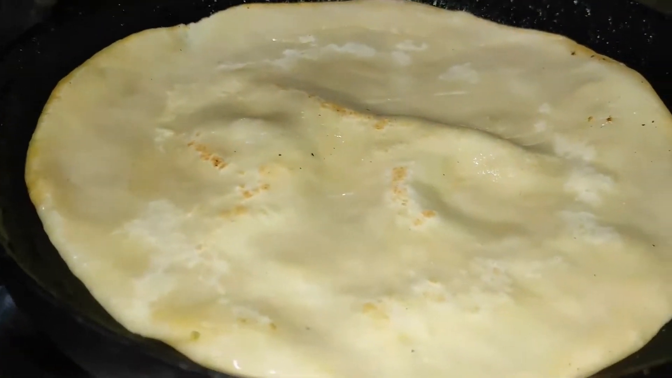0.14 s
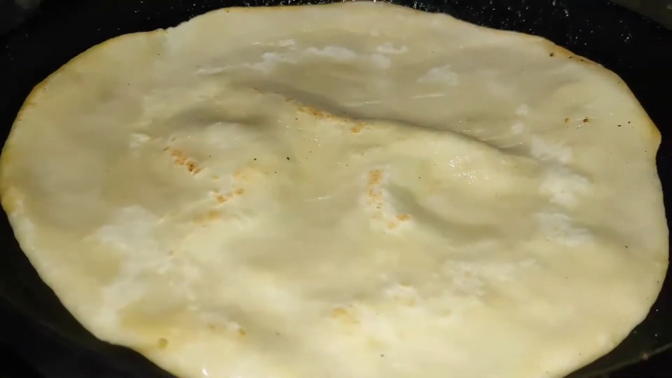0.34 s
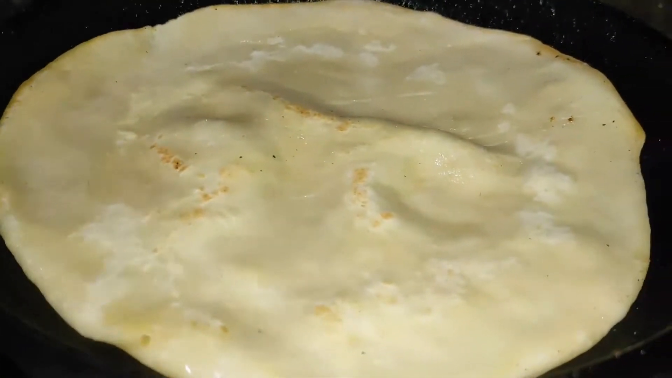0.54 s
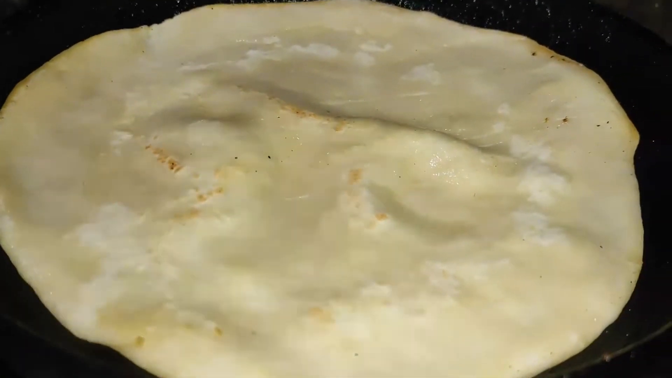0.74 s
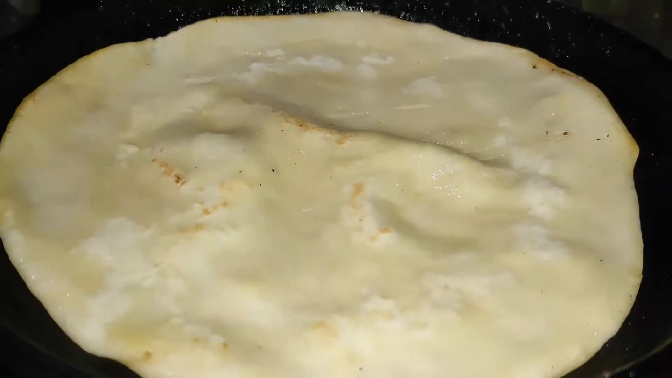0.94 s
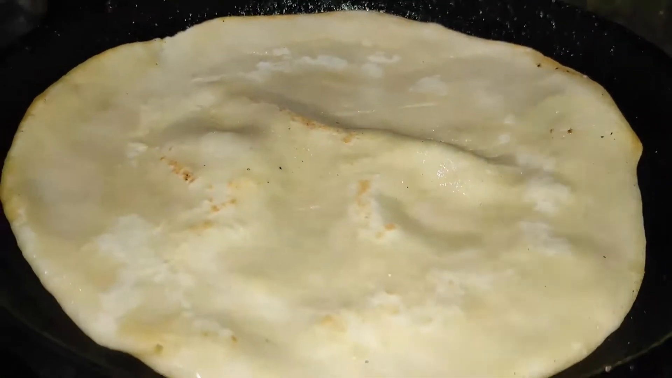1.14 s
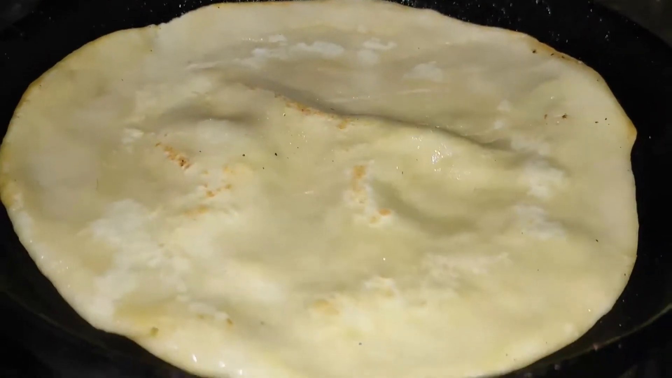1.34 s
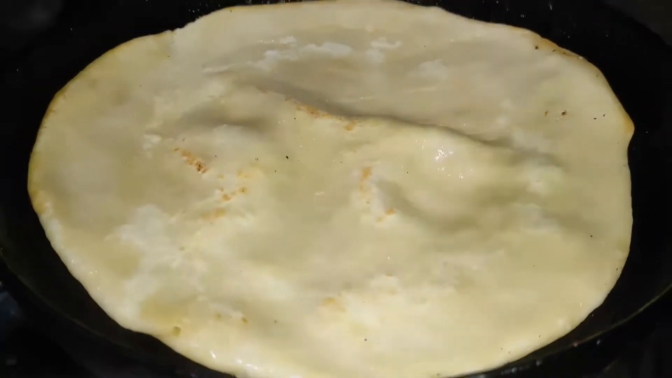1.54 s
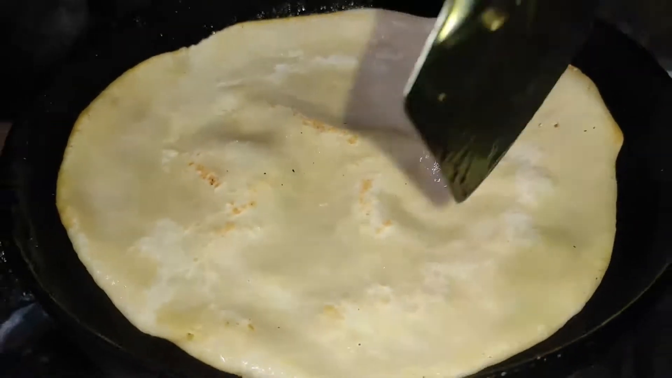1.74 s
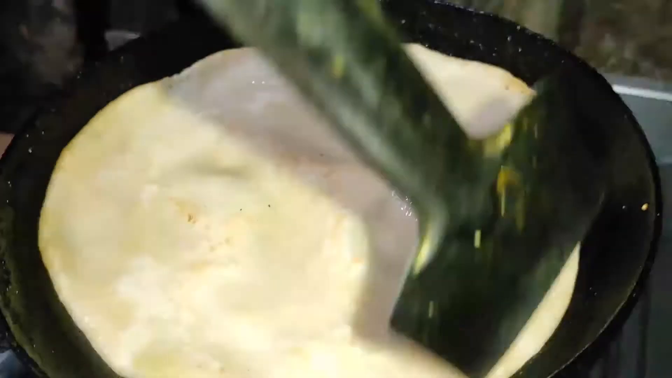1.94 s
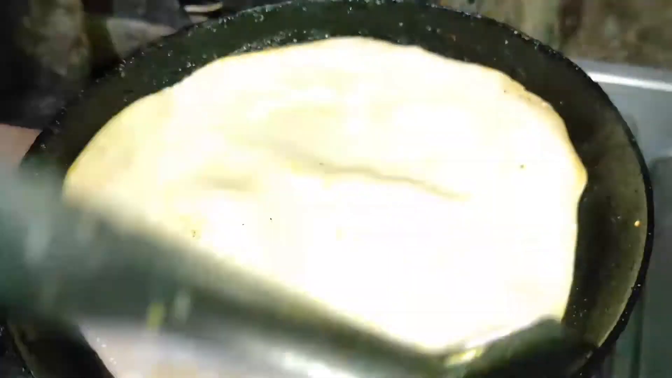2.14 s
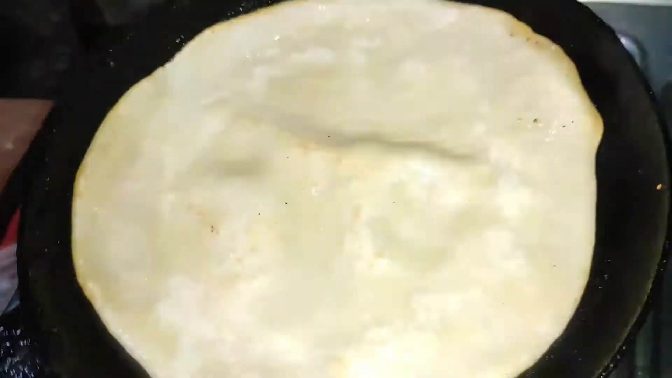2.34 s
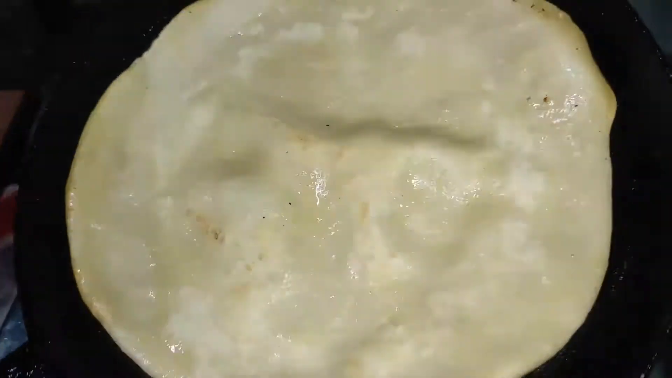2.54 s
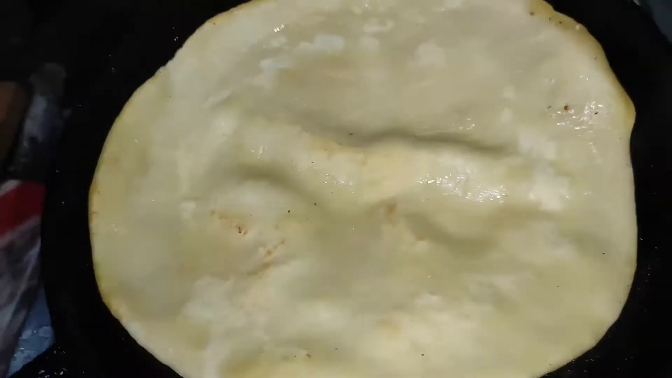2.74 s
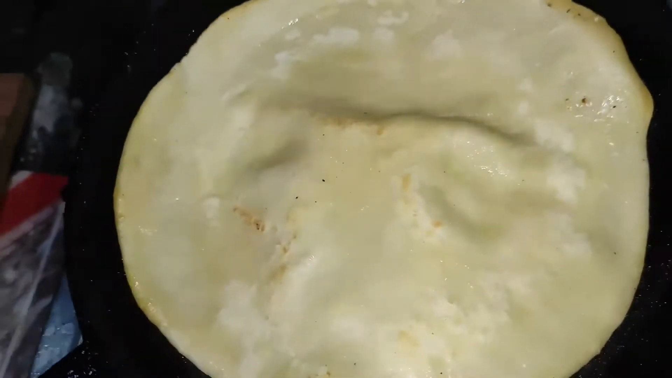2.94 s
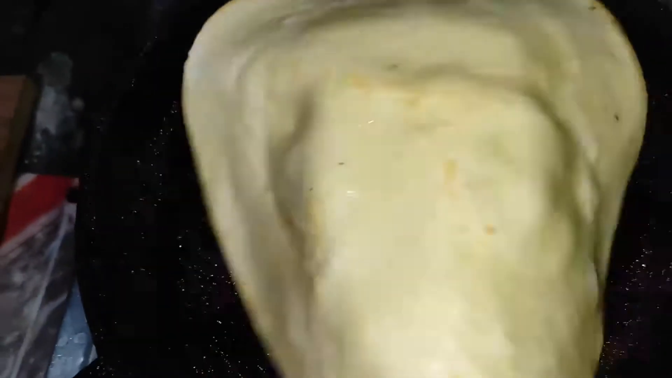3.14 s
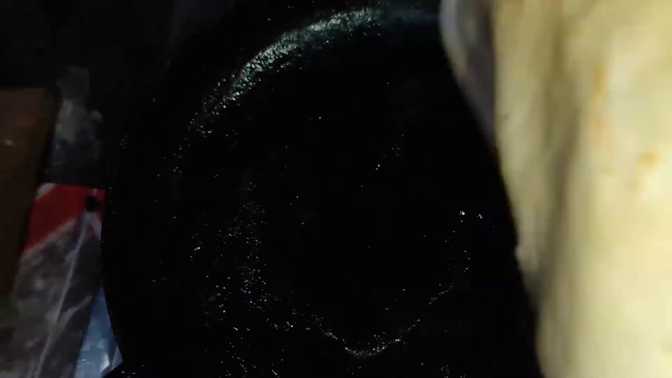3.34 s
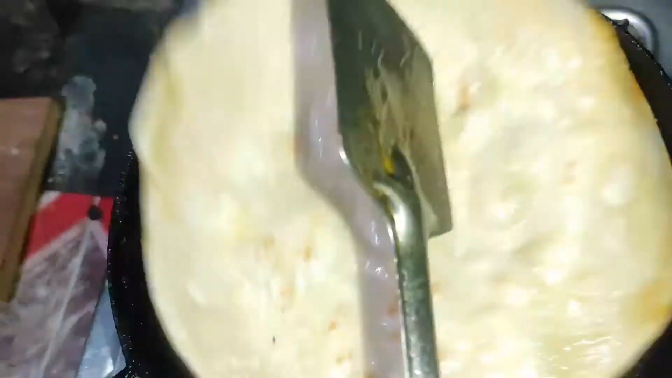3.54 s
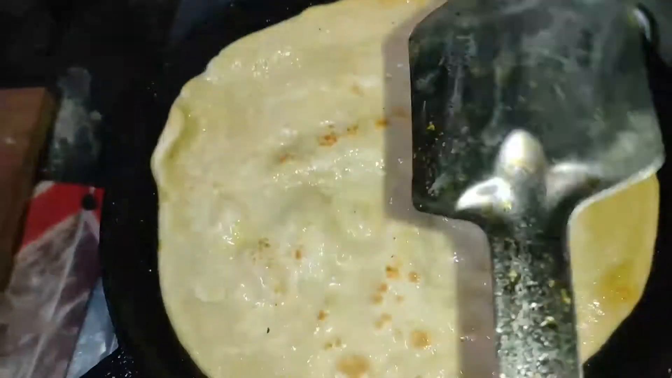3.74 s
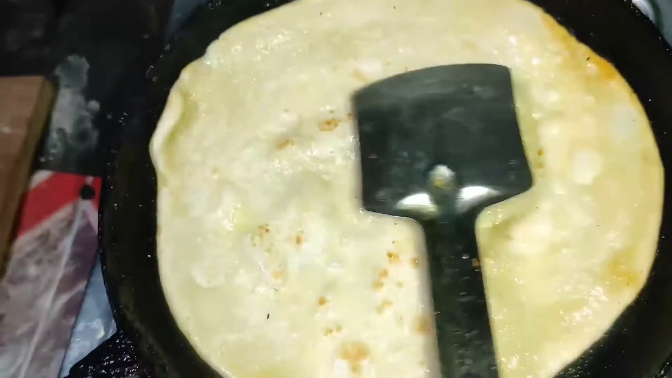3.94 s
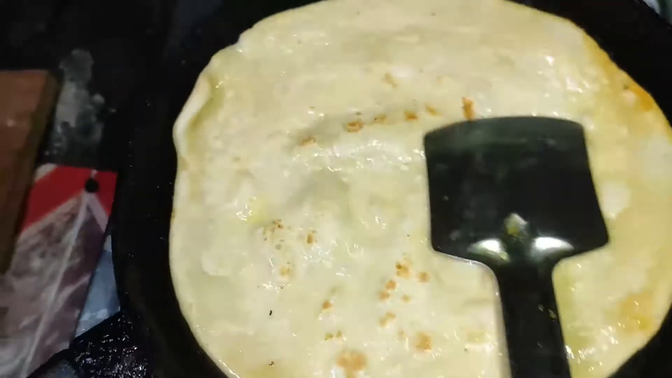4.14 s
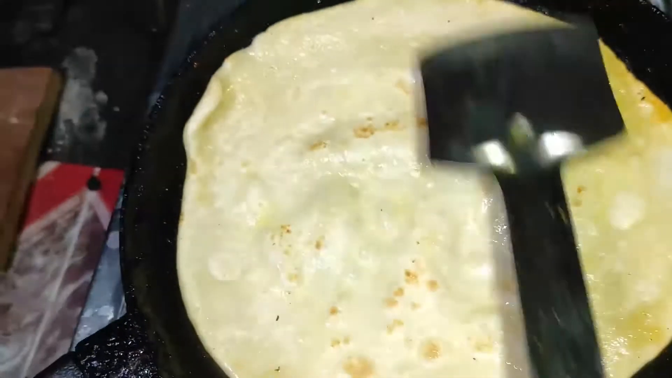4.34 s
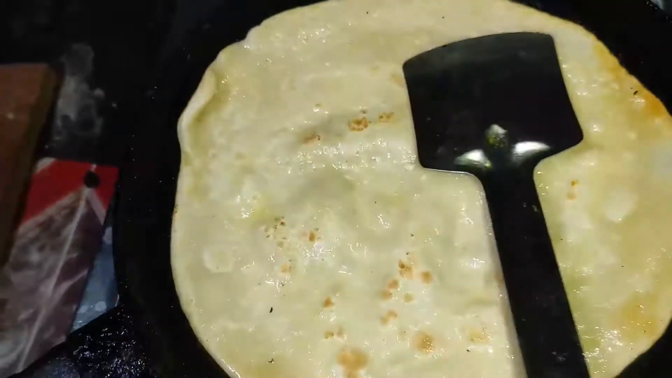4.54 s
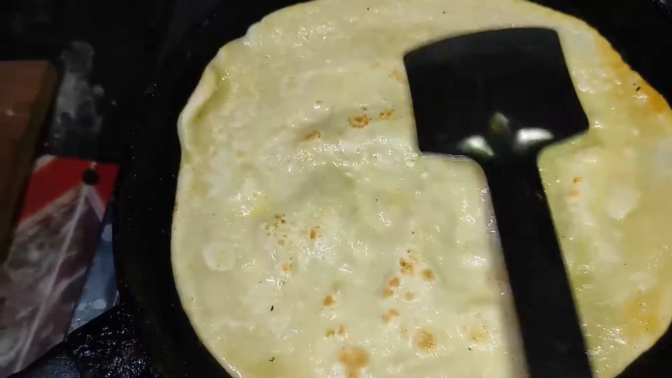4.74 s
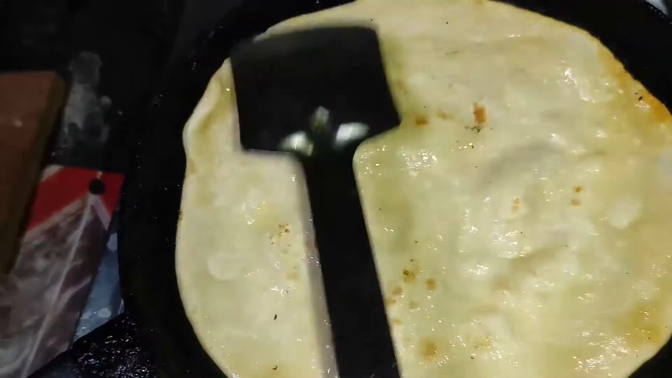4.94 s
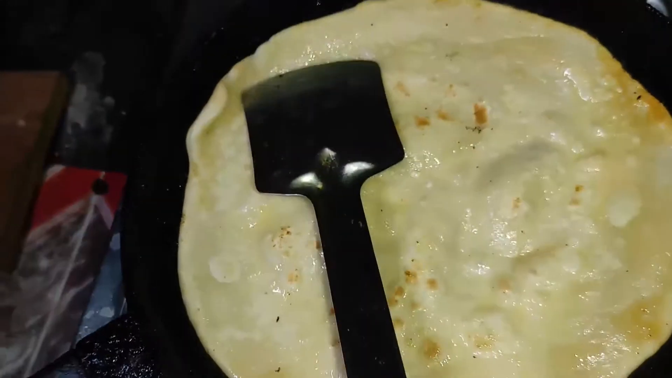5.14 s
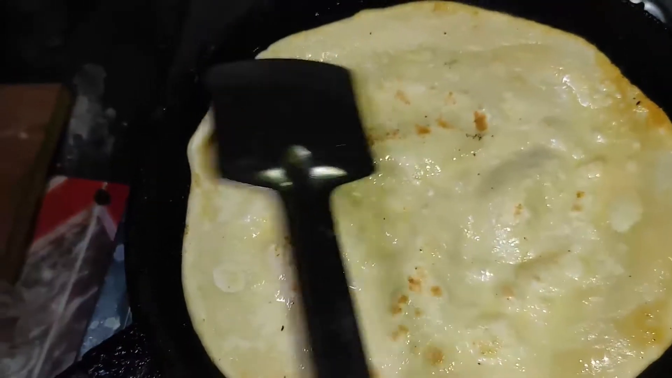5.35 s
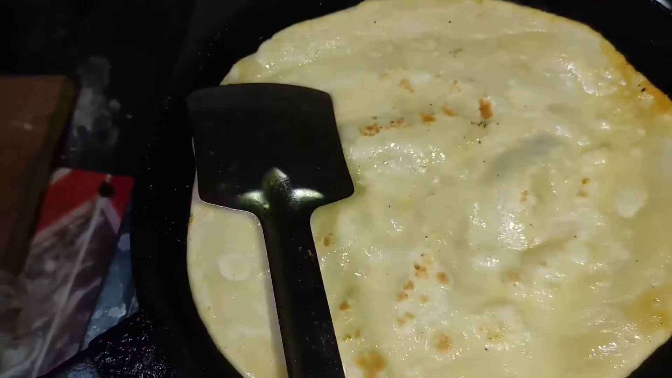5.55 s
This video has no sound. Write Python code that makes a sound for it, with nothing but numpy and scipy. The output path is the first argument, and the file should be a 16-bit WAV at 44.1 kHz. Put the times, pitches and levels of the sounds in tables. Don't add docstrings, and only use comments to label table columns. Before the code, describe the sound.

A metal spatula knocks and scrapes on a heavy pan as frying bread hisses, spits and crackles softly in a close, quiet kitchen.

```python
import sys
import numpy as np
from scipy import signal
from scipy.fft import rfft, irfft, next_fast_len
from scipy.io import wavfile
from scipy.ndimage import uniform_filter1d

SR = 44100
rng = np.random.default_rng(int(sys.argv[2]) if len(sys.argv) > 2 else 0)


def store_pcm(level_fs):
    pcm = np.round(np.clip(level_fs, -1, 1) * 32767).astype(np.int16)
    wavfile.write(sys.argv[1], SR, np.atleast_2d(pcm).T)


def elevation(decibels):
    levels = np.asarray(decibels, float)
    return 10 ** (levels / 20)


N = 247401

# peak_s, crack_db, pan_ring_db, ring_t60_s, rise_s
BLOWS = [(2.371, -35, -33, 0.46, 0.00098), (2.414, -32.5, -48, 0.37, 0.0013), (2.508, -41, -41, 1, 0.011),
         (2.7, -40, -43.5, 0.11, 0.0033), (2.988, -6.5, -26.5, 0.39, 0.0016),
         (3.325, -52, -46.5, 0.3, 0.0023), (3.943, -8, -20, 0.34, 0.0044),
         (3.971, -11.5, -24, 0.18, 0.0028), (3.983, -17.5, -25, 0.44, 0.00192),
         (4.344, -32, -54, 0.15, 0.0024), (4.416, -37.5, -48.5, 0.34, 0.0019),
         (4.806, -31.5, -43.5, 0.53, 0.00077), (5.345, -51, -49.5, 0.58, 0.0036)]
# pitch_hz, width_hz, level_db
BLADE_EDGE = [(1000, 95, 3.5), (1283, 96, 7.5), (1760, 83, -5), (1870, 110, -20), (2200, 410, -1),
              (2710, 200, 1), (3120, 65, 1), (3450, 190, -6), (3730, 290, -3)]
# pitch_hz, level_db, t60_s
PAN_MODES = [(102, -43, 0.32), (199.7, -11.5, 0.86), (241, -4, 0.28), (350, 3, 0.34), (427.5, 1, 0.34),
             (450, 5.5, 0.094), (563, -14.5, 0.16), (684, -2, 0.17), (870, -10, 0.19), (890, -26, 0.49),
             (1068, -1, 0.16), (1180, -0.5, 0.1), (1330, -19, 0.49), (1755, 0.5, 0.16), (1890, -47, 0.35),
             (2260, -12, 0.3), (2760, -38, .3)]
# pitch_hz, level_db (per Hz)
STOVE_THUD = [(12, -53), (20, -37), (70, -20), (100, -14), (188, -3), (260, -2.5), (351, -2.5), (508, -1),
              (702, 2), (884, -5), (1090, -3), (1810, -21.5), (5000, -48), (6500, -75), (11000, -120)]
HARD_HZ, DB_PER_OCTAVE = 2280, 25

# peak_s, pressure_db, rise_s, fall_s, blade_hz
RUBS = [
    (2.385, -39, 0.014, 0.013, 800),
    (2.424, -42, 0.016, 0.012, 726),
    (2.502, -37, 0.028, 0.022, 760),
    (2.71, -44.5, 0.22, 0.077, 697),
    (3.334, -52, 0.043, 0.011, 825),
    (1.45, -59, 0.05, 0.071, 720),
    (4.53, -45, 0.1, 0.042, 465),
    (5.36, -62, 0.041, 0.13, 820),
]
# peak_s, pressure_db, rise_s, fall_s, blade_hz
DRAGS = [
    (2.97, -44.5, 0.088, 0.071, 1090),
    (3.012, -35, 0.019, 0.063, 1110),
    (3.1, -42, 0.093, 0.085, 1280),
    (3.22, -57, 0.093, 0.096, 930),
    (4.36, -57, .01, 0.028, 900),
    (4.49, -48.5, 0.11, 0.094, 950),
]
RUB_UPPER_DB, DRAG_UPPER_DB, UPPER_HZ = -24, -5, 2345
SAG_PER_S, SAG_FLOOR = 1.42, 0.73
UPPER_SAG = 0.3
# peak_s, level_db, rise_s, fall_s, pitch_hz
CAUGHT_NOTES = [(2.385, -41, 0.0093, 0.0073, 700), (2.389, -45, 0.0084, 0.03, 268),
                (2.44, -38.5, 0.043, 0.006, 474), (2.509, -44.5, 0.0097, 0.025, 930),
                (2.51, -40, .015, 0.022, 240), (2.51, -37.5, .015, 0.011, 459),
                (2.565, -44, 0.018, 0.016, 430), (2.595, -49.5, 0.021, 0.013, 238),
                (2.645, -54, 0.017, 0.01, 895), (2.72, -41.5, 0.029, 0.01, 727),
                (2.752, -48, 0.012, 0.014, 720), (2.845, -50, 0.022, 0.0092, 720),
                (2.941, -45.5, 0.032, 0.014, 437), (3.02, -44, 0.016, 0.034, 1308),
                (3.075, -43.5, 0.025, 0.033, 2200), (3.1, -36, 0.048, 0.04, 1333),
                (3.115, -42, 0.038, 0.027, 3200), (3.13, -42, 0.028, 0.025, 910),
                (3.145, -41.5, 0.027, 0.018, 2365), (3.18, -45.5, 0.041, 0.043, 2100),
                (3.204, -39.5, 0.029, 0.022, 967), (3.209, -48, 0.013, .02, 3120),
                (3.24, -46, 0.018, 0.014, 2110), (3.264, -41.5, .015, 0.02, 995),
                (3.33, -46.5, 0.014, 0.007, 784), (3.99, -29, 0.017, 0.013, 350),
                (4.83, -53.5, .02, 0.059, 231.3), (4.0, -43.5, 0.033, 0.083, 102),
                (4.25, -56, 0.084, 0.046, 328.7)]
NOTE_WIDTH_HZ, NOTE_SAG_PER_S = 57, 0.54

# pitch_hz, level_db (per Hz)
FIZZ_COLOUR = [(2060, -34), (3500, -19), (3680, -19.5), (3870, -20.5), (4100, -19.5), (4400, -19.5),
               (6120, -17), (6610, -10), (7800, -2), (8530, -4), (9620, -17), (11700, -22), (14000, -23),
               (16000, -25.5)]
# pitch_hz, level_db (per Hz)
HISS_COLOUR = [(530, -10.5), (900, -11), (1530, -7), (2220, -7), (2390, -2), (3010, -2.5), (3470, -9),
               (4710, -9), (6500, -1.5), (8450, -6.5), (14300, -120)]
# pitch_hz, level_db
WET_TILT = [(1500, -4), (3000, 1.5), (3600, 3.5), (5000, 3.5), (6500, 3.5), (9000, -16.5), (13000, 0)]
# (relative to fizz, added to HISS_DB)
HEAT = [(0, -52, 8), (.2, -48, -3), (.44, -48.5, 5), (.84, -47, 1), (.95, -49, -2.5), (1.55, -49, 0.5),
        (2.0, -47.5, 3.5), (2.36, -52, 0), (2.6, -49, -0.5), (2.95, -46.5, 6.5), (3.4, -50, -8),
        (3.7, -55, 1), (4.0, -52, 10.5), (4.3, -53.5, 0), (4.8, -52, 0), (5.2, -52.5, -0.5),
        (5.61, -50.5, 6)]
# peak_s, fizz_db, rise_s, fall_s, hiss_db (relative to fizz)
SURGES = [(1.7, -47.5, 0.37, 0.039, -2), (2.385, -44, 0.02, 0.03, -10), (2.499, -37, 0.034, 0.015, -7),
          (2.699, -43, 0.21, 0.018, -2), (2.981, -44, 0.057, 0.042, 8), (3.06, -32.5, 0.4, 0.47, -6.5),
          (3.201, -34.5, 0.25, 0.14, -9), (3.77, -45.5, .07, 0.13, -12), (3.939, -41, 0.0079, 0.0052, 23),
          (3.957, -34, 0.0099, 0.065, 2.5), (4.392, -47.5, 0.03, 0.05, -16),
          (4.425, -43, 0.036, 0.078, -11), (4.5, -52, 0.26, 0.1, 6), (4.821, -57, 0.027, 0.34, 1.5),
          (5.05, -61, 0.16, 0.043, 6)]
HISS_DB, FRESH_DB, DRYING_S = -10, 13, 0.62
HISS_FALL = 0.63

# start_s, peak_db, pan_db (left minus right)
SPITS = [(0.059, -36, 7), (0.183, -39, 11), (1.644, -37, -8), (1.9, -39, 8), (2.372, -26.5, -3),
         (2.487, -34, -13), (2.62, -35, -1), (3.067, -21, 1), (2.635, -30, -7), (2.814, -46, 10),
         (2.892, -34, -1), (2.926, -29, 5), (2.959, -41, -3), (2.991, -19, 5), (3.599, -35, 7),
         (3.668, -42, 7), (3.8336, -28, -6), (4.1653, -39, -7), (2.378, -34, -2), (4.801, -38, 0)]
# start_s, peak_db, pan_db
SPLASHES = [
    (0.0233, -40.5, 6),
    (2.413, -31, -4),
    (2.505, -26, -5),
    (3.543, -33, -2),
    (3.743, -27.5, 10),
    (3.8295, -30, 6),
    (3.939, -14.5, 1),
    (3.942, -10.5, 1.5),
    (4.342, -34, -2.1),
]
SPIT_HZ, SPIT_S = 5750, 0.0016
SPLASH_HZ, SPLASH_S = 2850, 0.00223
# start_s, peak_db, lowest_hz, pan_db
CRACKLES = [(0.0235, -32, 2980, 5), (0.222, -38, 3500, 11), (2.369, -33, 5500, 0),
            (2.4114, -21.5, 2500, -1), (2.532, -40, 6000, 2), (2.7948, -45, 6000, -2),
            (2.859, -30, 6000, 1), (2.8902, -26, 5500, 0), (2.981, -27, 5500, 0), (3.0715, -29, 6500, 1),
            (3.3058, -25.5, 5590, -8), (3.3925, -29, 5500, -1), (3.4478, -35, 5500, 0),
            (3.4673, -30, 5500, 2), (3.5147, -28, 5500, -3), (3.5215, -26, 5500, 0),
            (3.5378, -19.5, 2540, 0), (3.5535, -31, 5500, 0), (3.576, -28, 5000, -2),
            (3.5925, -26.5, 4500, -4), (3.6065, -29, 4200, -3), (3.6638, -23, 3200, 3),
            (3.7385, -25, 2500, 5), (3.752, -35, 4510, 4), (3.7701, -36, 5500, 8), (3.828, -27, 2500, 3),
            (4.1657, -27, 4460, -3), (4.317, -33, 5000, 4), (4.4195, -37, 5000, 1), (4.4575, -37, 5500, 1),
            (4.9246, -42, 6000, -1), (5.4619, -43, 6000, -1)]
CRACKLE_S = 0.0015
# pitch_hz, level_db
CRACKLE_TOP = [(6500, -2), (8200, 7.5), (9800, -12), (12500, -11.5), (15500, -18.5)]
# start_s, peak_db, centre_hz
TICKS = [(0.025, -34.5, 2730), (0.0867, -37, 2330), (0.192, -34.5, 2620), (0.409, -46, 1500),
         (0.524, -43, 980), (.663, -41, 1900), (0.592, -38, 2850), (0.974, -38.5, 1830), (1.403, -46, 1510),
         (1.515, -59, 2020), (1.598, -42, 2000), (1.838, -44, 1200), (2.413, -27, 3450),
         (4.8015, -38, 2800), (4.8045, -21.5, 2540), (4.8047, -27.5, 3460), (4.8045, -34, 1650),
         (4.345, -37, 2900), (4.3455, -41, 4000), (4.352, -42, 3300), (3.607, -45, 2300),
         (4.8082, -36, 880), (5.054, -41, 2270), (5.345, -39, 2200)]
TICK_WIDTH, TICK_S = 0.65, 0.0013

# start_s, peak_db, t60_s, upper_modes_db, pan_db
TINKLES = [
    (0.588, -49, 0.13, -13, 16),
    (0.6986, -40.5, 0.15, -17, 19.5),
    (0.8403, -35, 0.22, -16, 6.5),
    (2.4694, -48, 0.21, -19, -1),
    (3.639, -36.5, 0.15, -23, 18),
    (4.344, -42.5, 0.14, -28, 15.5),
    (4.8015, -45, 0.06, -10, 5),
    (4.8165, -48, 0.23, -22, 12),
    (4.8266, -43.5, 0.18, -22, 10),
    (0.8268, -44, 0.15, -18, 5),
]
# pitch_hz, level_db, t60_share
TINKLE_MODES = [(8410, 3.5, 0.65), (12200, -13, 0.25), (7560, -6.5, 0.48), (14500, -19, .5),
                (5880, -34, 0.4)]

# time_s, level_db
RUMBLE = [(0, -58.5), (.5, -57.5), (1.1, -59), (1.36, -60.5), (1.45, -56), (1.7, -58), (2.0, -60),
          (2.6, -59.5), (3.3, -56.5), (3.6, -62.5), (3.9, -61.5), (4.2, -58.5), (4.6, -58.5), (5.2, -61),
          (5.61, -60.5)]
# pitch_hz, level_db (per Hz)
RUMBLE_COLOUR = [(12, -29.5), (20, 0), (38, -5.5), (54, 6), (74, -11), (103, 4), (134, -8), (160, -1.5),
                 (240, 1), (312, -6), (398, -14.5), (431, -8), (487, -15), (660, -7), (1160, -13),
                 (2500, -13.5), (3250, -15.5), (5500, -120)]
# pitch_hz, likeness (0 to 1)
LIKENESS = [(60, 1), (150, 0.78), (380, 1), (950, 0.75), (2380, 0.15), (5980, 0.041), (15000, 0.033)]
# pitch_hz, t60_s
KITCHEN = [(150, 0.22), (600, 0.4), (2000, 0.46), (6000, 0.05), (14000, 0.27)]

# pitch_hz, level_db
PORT_DB = [(60, 2), (110, 3.5), (200, 5), (380, 3.5), (700, 2), (1290, -1), (2380, 4.5), (4400, 1),
           (8120, 1), (15000, 3.5)]
# pitch_hz, phase_rad
PORT_LEAD = [(60, 0.85), (500, -0.68), (1200, -0.94), (2500, -1.3), (5000, -1.94), (9000, -1),
             (15000, -7.5)]
# pitch_hz, level_db
TOP_EDGE = [(15700, 0), (16000, -22), (16600, -30), (16750, -100)]
# pitch_hz, share (of surrounding power below which a spot is shut)
GATE_SHARE = [(1000, 0.05), (1500, .3), (3000, .35), (3600, .78), (6300, .78), (7500, .62), (9000, .66),
              (10000, .84), (16000, .86)]
GATE_DB = -36
SUDDEN = 1.5


def evened(x):
    return x / np.sqrt(np.mean(x ** 2) + 1e-20)


def read(points, hz):
    f, value = np.transpose(points)
    return np.interp(np.log(hz + 1), np.log(f + 1), value)


def follow(rows, column):
    rows = np.array(rows)
    return np.interp(np.arange(N) / SR, rows[:, 0], rows[:, column])


def add(mix, s, sound):
    part = mix[..., max(round(s * SR), 0):][..., :sound.shape[-1]]
    part += sound[..., :part.shape[-1]]


def placed(peak_db, pan_db):
    return elevation(peak_db + pan_db * np.array([[.5], [-.5]]))


def burst(rise, fall, length):
    t = np.arange(round(length * SR)) / SR - rise
    return np.where(t < 0, np.exp(3 * np.minimum(t, 0) / rise), np.exp(-np.maximum(t, 0) / fall))


def colour(x, points):
    size = next_fast_len(x.shape[-1])
    gain = elevation(read(points, np.fft.rfftfreq(size, 1 / SR)))
    return evened(irfft(rfft(x, size) * gain, size)[..., :x.shape[-1]])


def causal(points):
    level_db = read(points, abs(np.fft.fftfreq(8192, 1 / SR)))
    log_gain = np.log(elevation(np.maximum(level_db, -100)))
    taps = np.fft.ifft(np.exp(np.conj(signal.hilbert(log_gain)))).real[:4096]
    return taps / np.linalg.norm(taps)


def resonate(x, hz, width):
    turn = np.exp(2j * np.pi * np.cumsum(hz * np.ones(len(x))) / SR)
    r = np.exp(-np.pi * abs(width) / SR)
    return 2 * (turn * signal.lfilter([1 - r], [1, -r], x / turn)).real


def dull(x, hz):
    return signal.sosfilt(signal.butter(2, np.clip(hz, 100, 15000), fs=SR, output="sos"), x)


def bed(points, patch_db, flicker_db):
    frames, hz = N // 128 + 5, np.fft.rfftfreq(512, 1 / SR)
    a, b, c, d, patches = rng.standard_normal((frames, 257, 5)).T
    patches = evened(uniform_filter1d(uniform_filter1d(patches, 6, 0), 16, 1))
    flicker = evened(uniform_filter1d(rng.standard_normal(frames), 4))
    same = np.clip(read(LIKENESS, hz), -1, 1)[:, None]
    left = a + 1j * b
    right = same * left + np.sqrt(1 - same ** 2) * (c + 1j * d)
    z = np.array([left, right]) * elevation(patch_db * patches + flicker_db * flicker)
    return colour(signal.istft(z, nperseg=512, noverlap=384)[1][:, :N], points)


def pan_body(damping, thud_db):
    t = np.arange(SR // 3) / SR
    modes = sum(elevation(db - 60 * damping * t / t60) * np.sin(2 * np.pi * hz * t) for hz, db, t60 in PAN_MODES)
    modes /= np.linalg.norm(modes)
    modes[:4096] += elevation(thud_db) * causal(STOVE_THUD)
    return modes / np.linalg.norm(modes)


def blows():
    out, body = np.zeros(N), pan_body(3.75, -0.36)
    for s, crack_db, ring_db, t60, rise in BLOWS:
        rise = max(rise, 3e-4)
        top_hz = HARD_HZ * 2 ** (crack_db / DB_PER_OCTAVE)
        hit = rng.standard_normal(SR // 2) * burst(rise, 0.0027 + 0.6 * rise, .5)
        hit[round(rise * SR)] += 5
        crack = np.zeros(len(hit))
        for k, (hz, width, db) in enumerate(BLADE_EDGE):
            mode = resonate(resonate(hit, hz, 1.95 * width), hz, 1260)
            crack += (-1) ** k * elevation(db) * mode
        rattle = rng.standard_normal(SR // 2) * burst(rise + 0.0013, max(t60, .02) / np.log(1000), .5)
        ring = signal.oaconvolve(dull(rattle, top_hz), body)[:SR // 2]
        ring /= 2 * np.sqrt(np.mean(ring[:2000] ** 2))
        add(out, s - rise, elevation(crack_db) * crack / abs(crack).max() + elevation(ring_db + 0.5) * ring)
    return out


def blade_overtones(grit, hz):
    upper = np.zeros(len(grit))
    for k, db in [(1, -8), (1.16, -2), (1.33, -12)]:
        upper += elevation(db) * evened(resonate(resonate(grit, k * hz, 90), k * hz, 160))
    return evened(upper + elevation(9.0) * evened(resonate(grit, 2500, 920)))


def scraping():
    out, body = np.zeros(N), pan_body(0.83, -5.5)
    strokes = [(*row, RUB_UPPER_DB) for row in RUBS] + [(*row, DRAG_UPPER_DB) for row in DRAGS]
    for s, pressure_db, rise, fall, top_hz, upper_db in strokes:
        pressure = burst(rise, fall, rise + 5 * fall)
        t = np.arange(len(pressure)) / SR
        hz = top_hz * np.clip(1 - SAG_PER_S * abs(t - rise), SAG_FLOOR, 1)
        upper_hz = UPPER_HZ * (1 - UPPER_SAG * SAG_PER_S * (t - rise))
        noise = rng.standard_normal((2, SR))[:, :len(t)]
        slips = elevation(2.6 * evened(uniform_filter1d(noise[0], 500)))
        grit = slips * noise[1] * elevation(2.1 * rng.exponential(1, SR)[:len(t)])
        blade = evened(resonate(resonate(grit, hz, 120), hz, 146))
        pan = evened(signal.oaconvolve(dull(grit, 1440), body)[:len(t)])
        sound = evened(elevation(-1.5) * blade + pan) + elevation(upper_db) * blade_overtones(grit, upper_hz)
        add(out, s - rise, elevation(pressure_db) * pressure * sound)
    return out


def caught_notes():
    out = np.zeros(N)
    for s, db, rise, fall, hz in CAUGHT_NOTES:
        shape = burst(rise, fall, rise + 5 * fall)
        t = np.arange(len(shape)) / SR - rise
        drive = rng.standard_normal(SR // 2)[:len(t)]
        path_hz = hz * (1 - NOTE_SAG_PER_S * t)
        steady = np.sin(2 * np.pi * np.cumsum(path_hz) / SR)
        rough = evened(resonate(drive, path_hz, NOTE_WIDTH_HZ))
        add(out, s - rise, elevation(db) * shape * (steady + 1.04 * rough))
    return out


def frying():
    size = elevation(4.2 * np.minimum(rng.exponential(1, N), 5)) * (rng.random(N) < 900 / SR)
    side = rng.random(N)
    bubbles = colour(size * rng.choice([-1, 1], N) * np.array([side, 1 - side]), FIZZ_COLOUR)
    fizz = evened(bed(FIZZ_COLOUR, 3.3, 0.56) + 0.29 * bubbles)
    hiss = bed(HISS_COLOUR, 2.93, 1.27)
    wet_hiss = colour(hiss[:, ::-1], WET_TILT)
    fizz_power = elevation(follow(HEAT, 1)) ** 2
    hiss_power = fizz_power * elevation(HISS_DB + follow(HEAT, 2)) ** 2
    wet = np.sqrt(fizz_power) * elevation(HISS_DB + FRESH_DB) * np.exp(-np.arange(N) / SR / DRYING_S)
    for s, db, rise, fall, hiss_db in SURGES:
        length = rise + 6 * fall
        add(fizz_power, s - rise, (elevation(db) * burst(rise, fall, length)) ** 2)
        add(hiss_power, s - rise, (elevation(db + hiss_db) * burst(rise, HISS_FALL * fall, length)) ** 2)
    return np.sqrt(fizz_power) * fizz + np.sqrt(hiss_power) * hiss + wet * wet_hiss


def spits():
    out = np.zeros((2, N))
    drops = [(*row, SPIT_HZ, SPIT_S) for row in SPITS] + [(*row, SPLASH_HZ, SPLASH_S) for row in SPLASHES]
    for s, peak_db, pan_db, low_hz, length in drops:
        noise = rng.standard_normal((3, 2000))
        snap = burst(1.09 * length, length, 2000 / SR)
        sputter = 0.23 * burst(0.005, 1.5 * length, 2000 / SR)
        tick = (noise[0] + 0.15 * noise[1:]) * (snap + sputter)
        tick[:, round(0.79 * length * SR)] += 4
        shape = causal([(0.94 * low_hz, -36), (low_hz, -12), (6500, -9), (8200, 0), (9800, -13),
                        (12500, -20), (15500, -27)])
        tick = signal.oaconvolve(tick, shape[None, :512], axes=1)
        add(out, s - .5 * length, placed(peak_db, pan_db) * tick / abs(tick.mean(0)).max())
    return out


def crackles():
    out = np.zeros((2, N))
    for s, peak_db, low_hz, pan_db in CRACKLES:
        noise = rng.standard_normal((3, 600))
        snap = (noise[0] + 0.25 * noise[1:]) * burst(0.00023, CRACKLE_S, 600 / SR)
        snap[:, 12] += 1.6
        shape = causal([(0.69 * low_hz, -34), (min(low_hz, 6400), -11)] + CRACKLE_TOP)
        snap = signal.oaconvolve(snap, shape[None, :256], axes=1)
        add(out, s, placed(peak_db, pan_db) * snap / abs(snap.mean(0)).max())
    return out


def crust_ticks():
    out = np.zeros(N)
    for s, peak_db, hz in TICKS:
        click = 0.3 * rng.standard_normal(1000) * burst(0.00016, TICK_S, 1000 / SR)
        click[8] -= 2
        click = resonate(resonate(click, hz, TICK_WIDTH * hz), hz, TICK_WIDTH * hz)
        add(out, s, elevation(peak_db) * click / abs(click).max())
    return out


def tinkles():
    out, t = np.zeros((2, N)), np.arange(SR // 5) / SR
    for s, peak_db, t60, upper_db, pan_db in TINKLES:
        phase = 2 * np.pi * rng.random((len(TINKLE_MODES), 2, 1))
        ring = np.zeros((2, len(t)))
        for k, (hz, db, share) in enumerate(TINKLE_MODES):
            level_db = db + (upper_db + 17.5) * (k > 0) - 60 * t / (t60 * share)
            ring += elevation(level_db) * np.sin(2 * np.pi * hz * t + phase[k])
        add(out, s, placed(peak_db, pan_db) * ring * np.minimum(t / 0.00025, 1))
    return out


def burner():
    return elevation(follow(RUMBLE, 1) + 3.0) * bed(RUMBLE_COLOUR, 1.07, 2.55)


def kitchen(x):
    taps = np.zeros((2, SR // 2))
    at = np.arange(120, SR // 2 - 20, 20) + rng.integers(0, 20, (2, (SR // 2 - 121) // 20))
    np.put_along_axis(taps, at, rng.choice([-1., 1.], at.shape), 1)
    hz, t, z = signal.stft(taps, SR, nperseg=256)
    tail = signal.istft(z * elevation(-60 * t / read(KITCHEN, hz)[:, None]), SR, nperseg=256)[1]
    return signal.fftconvolve(x, tail / np.linalg.norm(tail[0]), axes=1)[:, :N]


def scene():
    near = blows() + scraping() + caught_notes() + spits() + crackles() + crust_ticks() + tinkles()
    return near + elevation(-10.5) * kitchen(near) + frying() + burner()


def microphones(x):
    size = next_fast_len(N + 4096)
    hz, half = np.fft.rfftfreq(size, 1 / SR), np.array([[.5], [-.5]])
    gain = elevation(half * read(PORT_DB, hz) + read(TOP_EDGE, hz))
    ports = gain * np.exp(1j * half * read(PORT_LEAD, hz))
    return irfft(rfft(x, size) * ports, size)[:, :N]


def noise_suppression(x):
    z, hz = signal.stft(x, nperseg=1024, noverlap=768)[2], np.fft.rfftfreq(1024, 1 / SR)
    power = (abs(z) ** 2).mean(0)
    spot = uniform_filter1d(uniform_filter1d(power, size=3, axis=0), size=6, axis=1)
    around = uniform_filter1d(uniform_filter1d(power, size=19, axis=0), size=6, axis=1)
    treble = np.sqrt(power[hz > 1500]).mean(0) ** 2
    calm = treble < SUDDEN * uniform_filter1d(treble, size=25)
    shut = calm & (spot < read(GATE_SHARE, hz)[:, None] * around)
    return signal.istft(z * np.where(shut, elevation(GATE_DB), 1), nperseg=1024, noverlap=768)[1][:, :N]


def top_cut(x):
    return signal.sosfilt(signal.butter(12, 16690, fs=SR, output="sos"), x)


def record(dry):
    mix = noise_suppression(microphones(dry))
    return top_cut(mix)


dry = scene()
out = record(dry)
store_pcm(out)
```